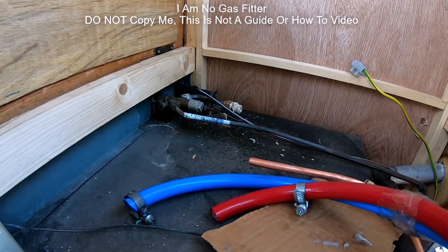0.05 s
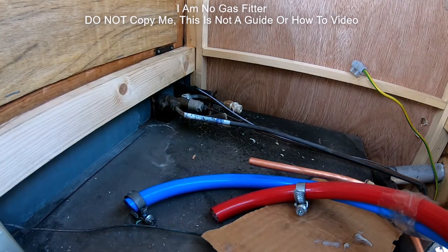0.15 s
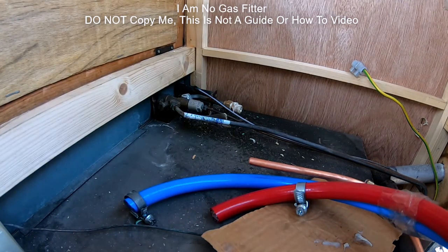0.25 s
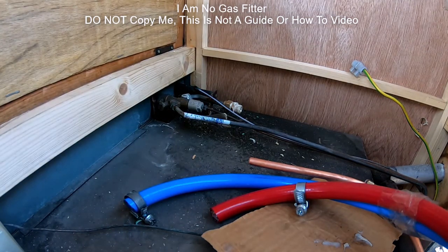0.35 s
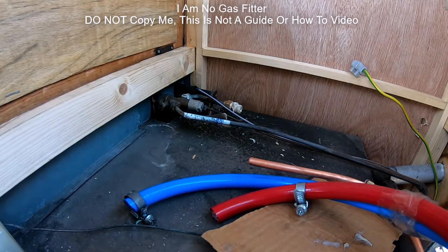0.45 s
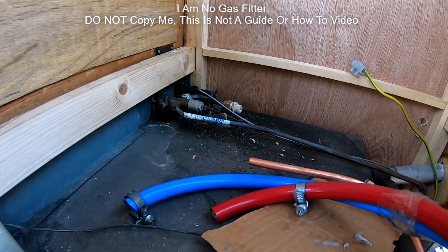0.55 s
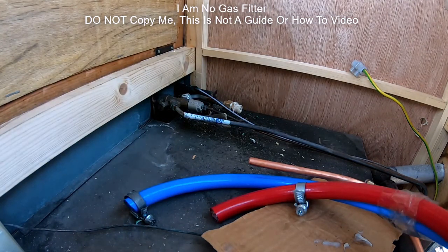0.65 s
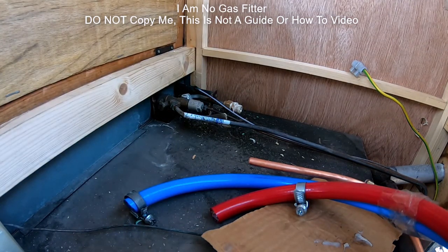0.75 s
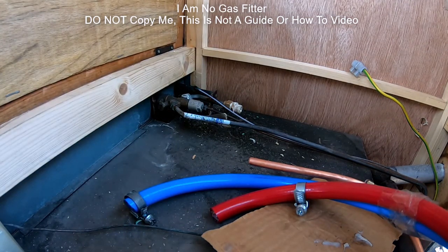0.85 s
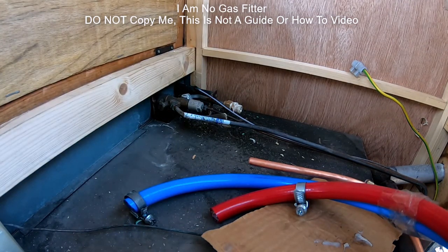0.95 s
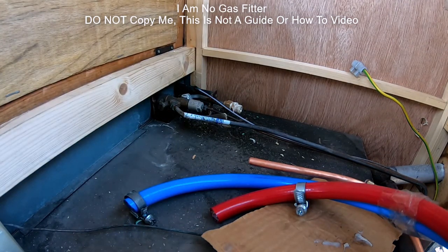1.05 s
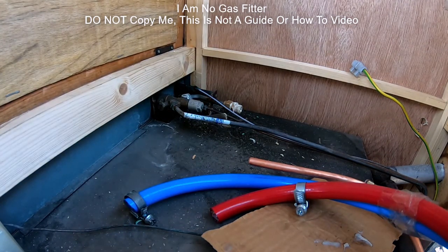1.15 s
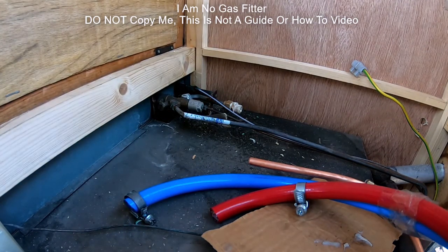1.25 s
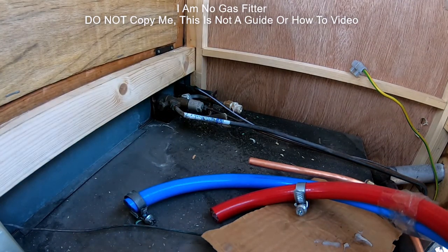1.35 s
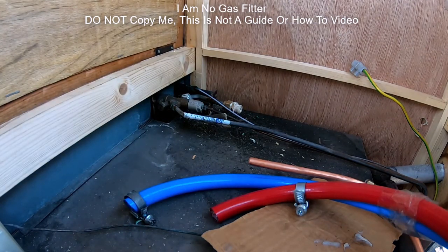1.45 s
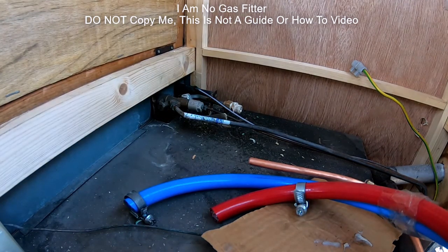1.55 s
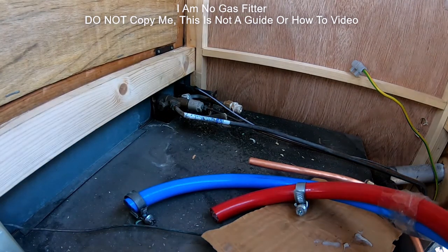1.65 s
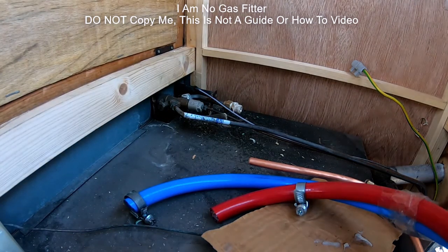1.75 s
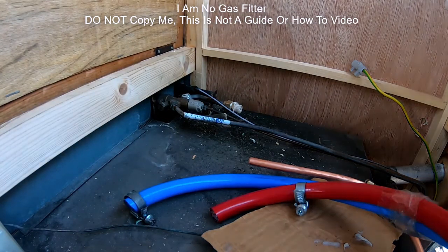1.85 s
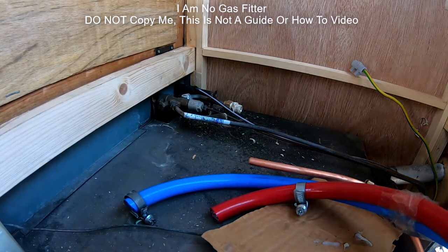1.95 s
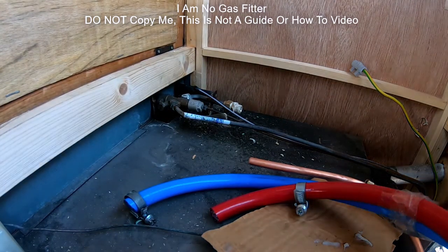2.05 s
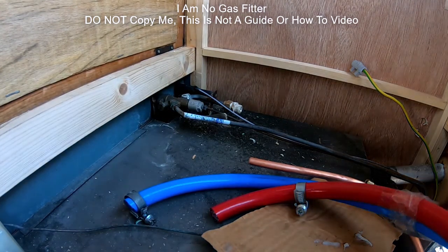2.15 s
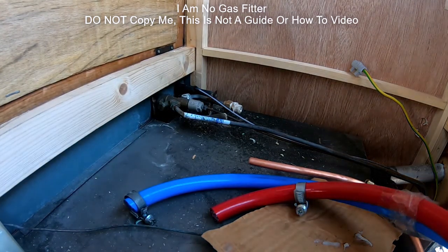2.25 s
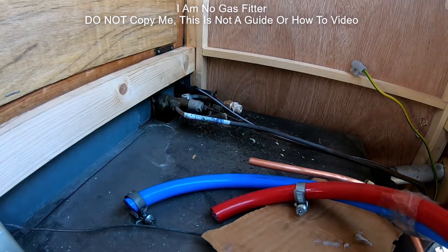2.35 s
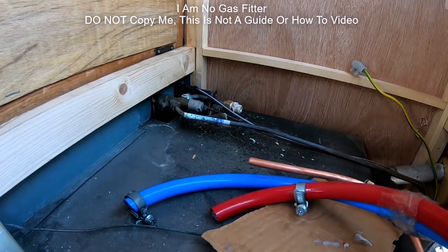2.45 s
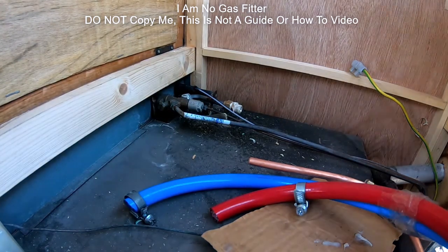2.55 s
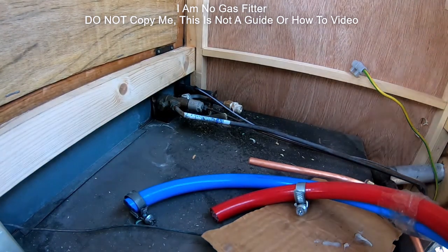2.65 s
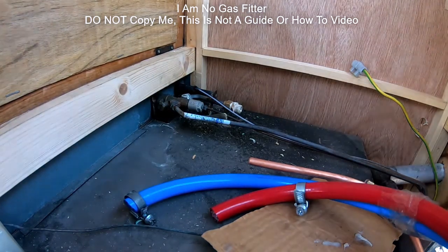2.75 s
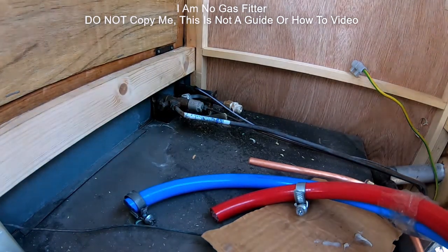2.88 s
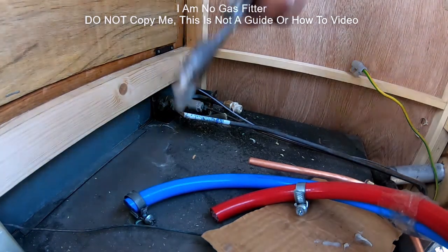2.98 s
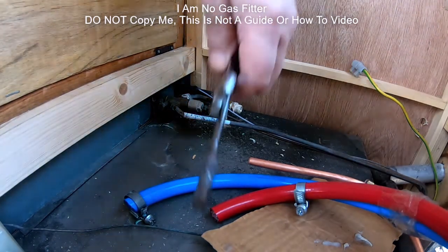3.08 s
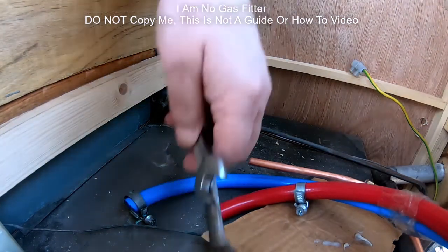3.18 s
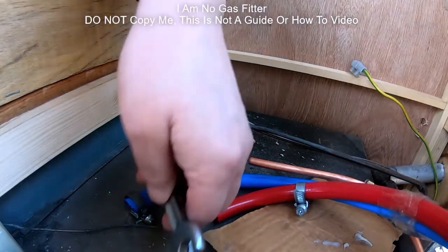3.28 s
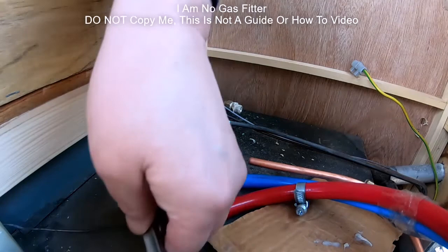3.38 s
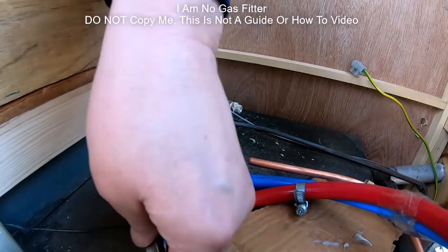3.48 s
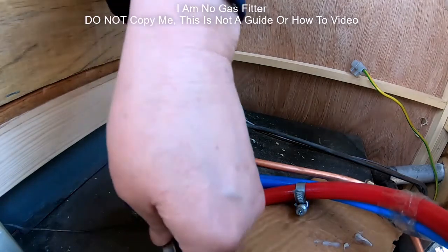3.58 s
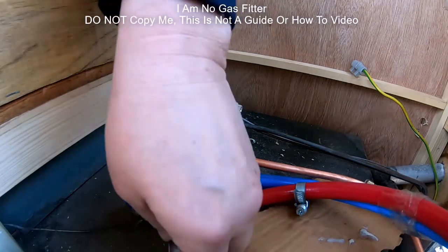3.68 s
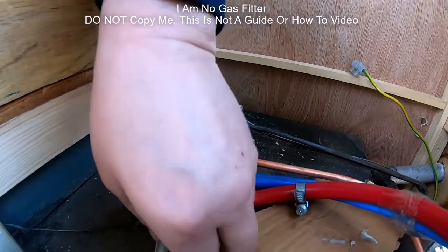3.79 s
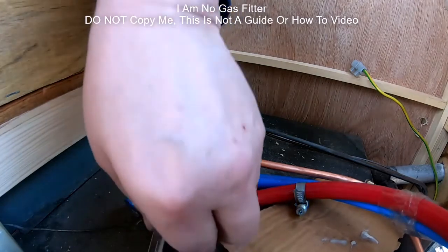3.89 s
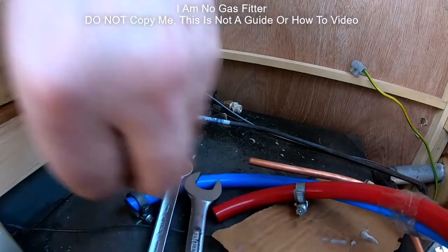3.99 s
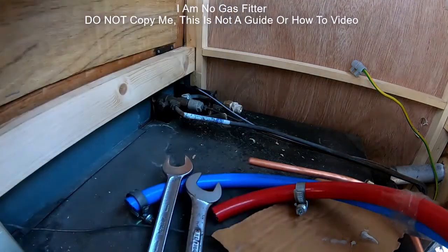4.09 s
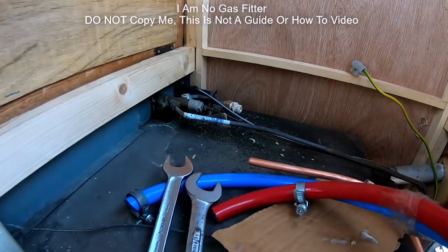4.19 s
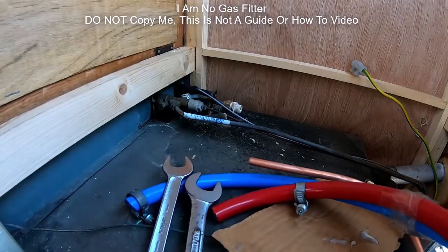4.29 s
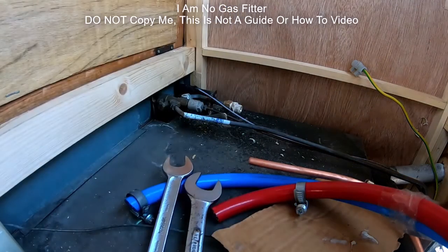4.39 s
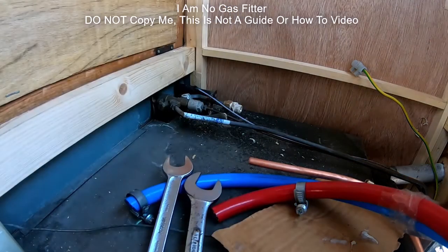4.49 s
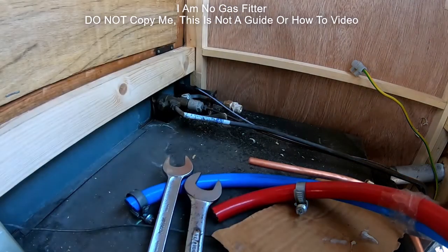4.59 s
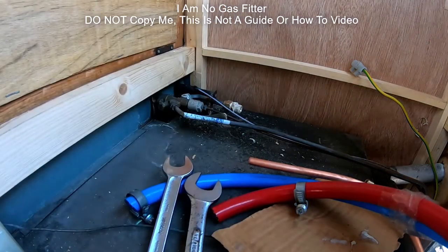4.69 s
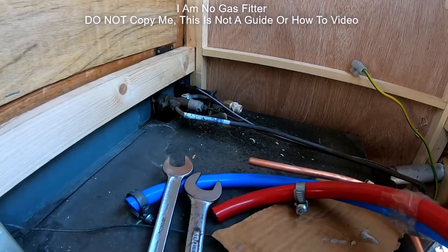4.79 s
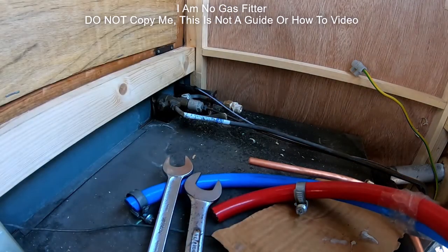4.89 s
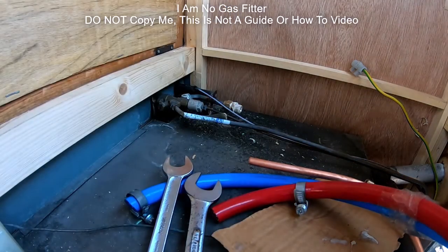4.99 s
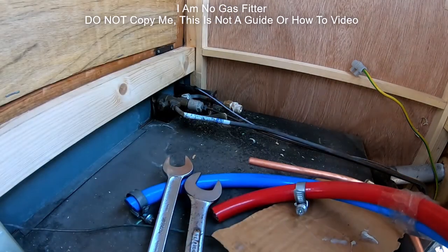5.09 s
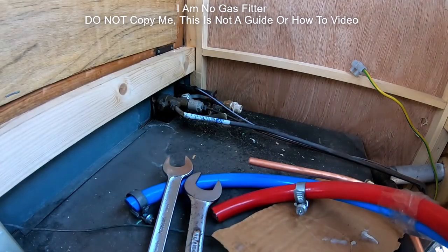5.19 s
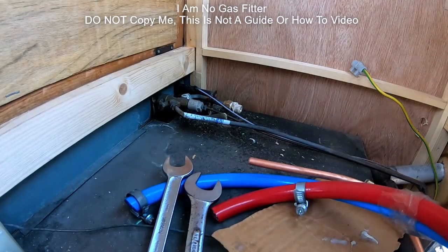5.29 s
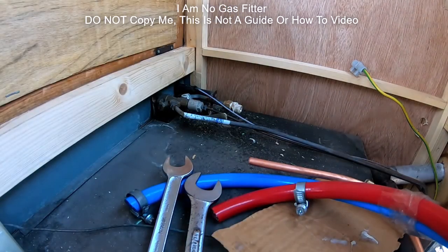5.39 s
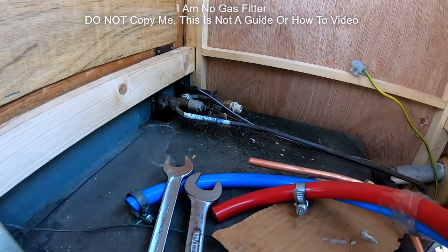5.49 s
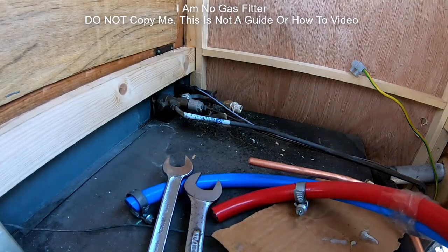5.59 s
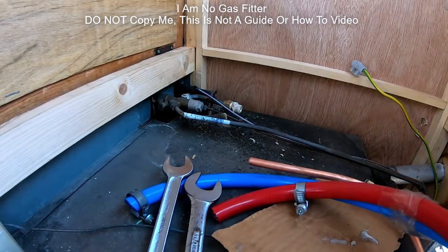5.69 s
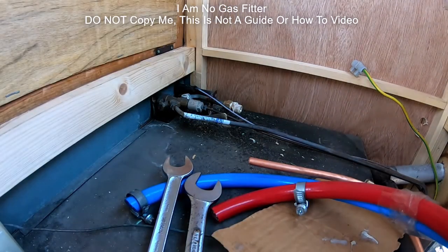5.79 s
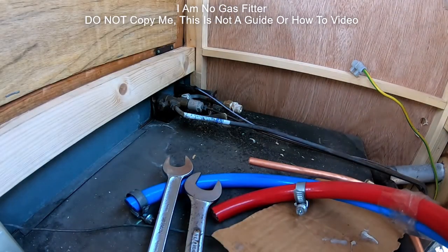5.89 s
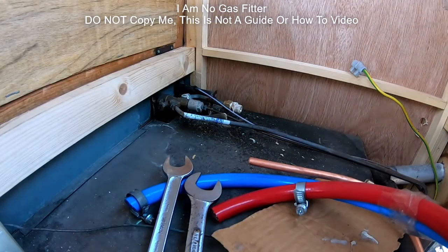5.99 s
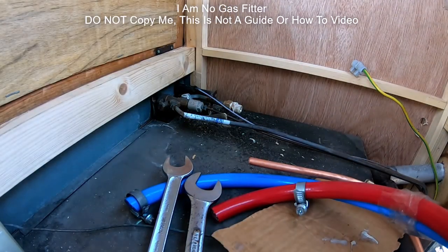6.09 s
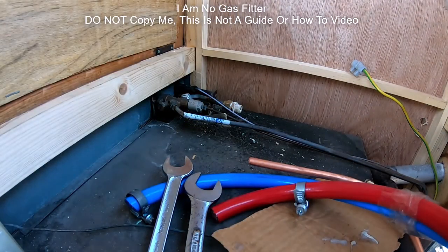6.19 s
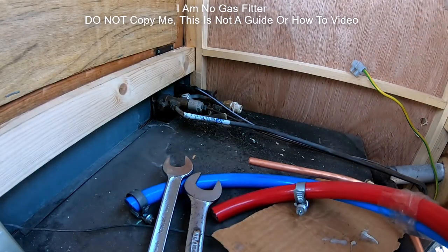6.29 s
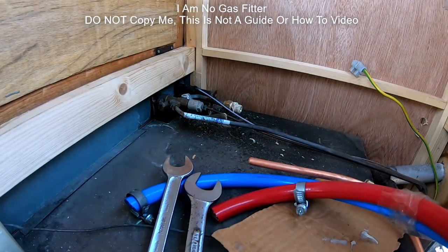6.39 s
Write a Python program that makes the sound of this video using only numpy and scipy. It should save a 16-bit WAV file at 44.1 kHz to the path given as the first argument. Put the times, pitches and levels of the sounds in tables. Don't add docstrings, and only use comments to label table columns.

```python
import sys
import numpy as np
from scipy import signal
from scipy.fft import rfft, irfft, next_fast_len
from scipy.io import wavfile
from scipy.ndimage import uniform_filter1d, map_coordinates

SR = 44100
rng = np.random.default_rng(int(sys.argv[2]) if len(sys.argv) > 2 else 0)


def master(y):
    cut = np.clip(np.atleast_2d(y).T, -1, 1)
    pcm = np.round(cut * 32767)
    wavfile.write(sys.argv[1], SR, pcm.astype(np.int16))


def invert_db(x):
    u = np.asarray(x, float) / 20
    return 10 ** u


N = 283987

# f/Hz, width/Hz, level/dB
BOARDS = [(67, 6.2, -6.5), (176.6, 36, 0.5), (242.2, 30, -9.5), (292, 30, -3), (399.7, 35, -5),
          (458.4, 33, 4.5), (576, 29, -12), (701, 30, -7), (915, 51, -14), (1425, 51, -18),
          (1910, 700, -23.5)]
# f/Hz, level/dB
CRACK = [(900, -19), (2000, -2), (5000, 0), (8500, 1), (10000, -15.5), (13500, -21), (16000, -30.5)]
# f/Hz, level/dB
THUMP = [(30, -19.5), (100, 0.5), (300, -3.5), (700, 1.5), (1500, -17), (4000, -37)]
DULL_DB, DULL_SLIDE_DB = -19, -22
EARS_APART = .75
SMOOTH_DB = 1


def unit(x):
    return x / np.sqrt(np.mean(x ** 2) + 1e-20)


def along(points, hz):
    f, v = np.transpose(points)
    return np.interp(np.log(hz + 1), np.log(f + 1), v)


def curves(rows, t):
    s, *cols = np.transpose(rows)
    return [np.interp(t, s, c) for c in cols]


def wobble(n, rate):
    return map_coordinates(rng.standard_normal(int(n * rate / SR) + 4), [np.arange(n) * rate / SR])


def swell(t, s, rise, fall, db):
    return invert_db(db - 20 * ((t - s) / np.where(t < s, rise, fall)) ** 2)


def pair(n, apart):
    mid, side = rng.standard_normal((2, n))
    return np.array([mid + apart * side, mid - apart * side])


def filtered(x, response):
    n = x.shape[-1]
    m = next_fast_len(n + min(n // 4, 8192))
    return irfft(rfft(x, m) * response(np.fft.rfftfreq(m, 1 / SR)), m)[..., :n]


def causal(gain):
    cepstrum = irfft(np.log(gain + 1e-6))
    half = len(cepstrum) // 2
    cepstrum[1:half] *= 2
    cepstrum[half + 1:] = 0
    return np.exp(rfft(cepstrum))


def body(modes, smooth, smooth_db, colour, scatter_db, apart, held=0):
    detune, hand_damps = .02, 1.6
    common = rng.standard_normal((len(modes), 1, 1))
    per_ear = rng.standard_normal((len(modes), 2, 1))
    luck = invert_db(scatter_db * (common + apart * per_ear))
    gripped = [(c * (1 + held * detune * rng.standard_normal()), w * hand_damps ** held, db)
               for c, w, db in modes]

    def response(f):
        rings = 0
        for k, (c, w, db) in enumerate(gripped):
            resonance = 1j * f * w / (c * c - f * f + 1j * f * w)
            rings = rings + (-1) ** k * luck[k] * invert_db(db) * resonance
        broadband = causal(invert_db(smooth_db + along(smooth, f)))
        return (rings + broadband) * causal(invert_db(along(colour, f)))
    return response


def strikes(events, modes, smooth, smooth_db, shade_hz, damping, rise, t60, push, apart, scatter_db, lift_db,
            held=0):
    grain_db = 3
    out = np.zeros((2, N + SR))
    t = np.arange(SR // 5) / SR
    usual = np.mean(events, 0)[2:]
    for s, db, *shade in events:
        envelope = invert_db(grain_db * wobble(len(t), 600) - 60 * t / t60) * (1 - np.exp(-t / rise)) ** 2
        chatter = pair(len(t), apart) * envelope
        force = chatter + push * 2 * t / rise * np.exp(-2 * t / rise)
        colour = sorted(list(zip(shade_hz, shade - usual)) + damping)
        fade = np.cos(np.pi / 2 * t / t[-1])
        ring = filtered(force, body(modes, smooth, smooth_db, colour, scatter_db, apart, held)) * fade
        peak = np.sqrt(uniform_filter1d(np.mean(ring ** 2, 0), size=200).max())
        out[:, round(s * SR):][:, :len(t)] += invert_db(db + lift_db) * ring / peak
    return out[:, :N]


def slides(strokes, modes, smooth_db, grit_db, colour):
    out = np.zeros((2, N))
    for s, rise, fall, db in strokes:
        a, b = round((s - 2 * rise) * SR), round((s + 2 * fall) * SR)
        grains = invert_db(grit_db * wobble(N // 20, 290))[:b - a]
        force = pair(N // 20, EARS_APART)[:, :b - a] * grains
        ring = unit(filtered(force, body(modes, CRACK, smooth_db, colour, 0.5, 0.34)))
        out[:, a:b] += swell(np.arange(a, b) / SR, s, rise, fall, db) * ring
    return out


def rush(spectrum, patchy_db):
    # f/Hz, correlation
    alike = [(60, .9), (130, .95), (200, .9), (400, .75), (1200, .3), (2400, .5), (8000, .05)]
    z = signal.stft(rng.standard_normal((2, N)), nperseg=512)[2]
    field = uniform_filter1d(rng.standard_normal(z.shape[1:]), size=6, axis=0)
    field = uniform_filter1d(field, size=8, axis=1)
    noise = signal.istft(z * invert_db(patchy_db * unit(field)), nperseg=512)[1][:, :N]

    def mid_and_side(hz):
        turn = np.arccos(np.clip(along(alike, hz), -1, 1)) / 2
        return invert_db(along(spectrum, hz)) * [np.cos(turn), np.sin(turn)]
    mid, side = filtered(noise, mid_and_side)
    return unit(np.array([mid + side, mid - side]))


def gripped_steel():
    # t/s, peak level/dB, low, middle and high modes/dB
    clinks = [(2.173, -27.5, 11.5, 5, -8.5), (2.179, -30, 12, 2.5, -5), (2.192, -38.5, 8.5, 1.5, -9),
              (2.2252, -23.5, -0.5, -3.5, -2), (2.233, -31.5, -7, -5, -4.5), (2.309, -33.5, -9, -4, -2.5),
              (2.325, -20, -7, -8, 4), (2.3341, -15, -10, -12.5, 1), (2.343, -25.5, -8, -7.5, 12),
              (2.3552, -31.5, -1, -7, 11.5), (2.387, -26, 5.5, 0.5, 1.5), (2.396, -30, 4.5, 0, -0.5),
              (2.422, -27, 8, 4.5, -9), (2.4319, -15, -9.5, 2, -3), (2.576, -43, 3.5, -1, -11)]
    # f/Hz, width/Hz, level/dB
    modes = [(1860, 19, -23), (3312, 50, -7), (4340, 50, -9), (4700, 80, -12.5), (5445, 63, -4),
             (6420, 41, -15), (7400, 43, -15.5), (7500, 56, 4), (7900, 60, 0.5), (8090, 87, 1),
             (8390, 310, -9.5), (10520, 24, -15), (11550, 44, -15.5), (12600, 35, -15), (13400, 50, -24),
             (14600, 60, -29.5)]
    # top t/s, rise/s, fall/s, level/dB
    strokes = [
        (2.185, 0.013, 0.068, -32.5),
        (2.235, 0.05, 0.11, -36),
        (2.345, 0.017, 0.034, -30.5),
    ]
    steel = strikes(clinks, modes, CRACK, DULL_DB, (3500, 5500, 11500),
                    [(7800, 0.0), (13800, -4.5), (16000, -14.5)], rise=0.0011, t60=0.068, push=0,
                    apart=EARS_APART, scatter_db=5.6, lift_db=-3.5, held=0.3)
    return steel + slides(strokes, modes, DULL_SLIDE_DB, 1.4,
                          [(3000, -1.0), (9000, -9.0), (14000, -6.5), (16000, -32.0)])


def turned_steel():
    # t/s, peak level/dB, low, middle and high modes/dB
    clinks = [
        (2.7007, -34.5, 3.5, -1.5, -2.5),
        (2.757, -26.5, 2.5, 12.5, -8),
        (2.78, -28.5, -6, 3, -13),
        (2.827, -20, -4.5, 1, 4),
        (2.9602, -57, -22, 2.5, 3.5),
        (3.1404, -52.5, -1, -7, -6),
        (3.1757, -46.5, -1.5, -17, 0),
    ]
    # f/Hz, width/Hz, level/dB
    modes = [(2054, 32, -12), (2494, 69, -11.5), (3300, 76, -17), (3800, 180, 1.5), (3820, 160, -7.5),
             (4150, 93, -10.5), (4400, 69, -4), (4630, 83, -4.5), (5830, 64, -4.5), (7220, 30, -10),
             (7630, 100, -3.5), (8480, 104, -14), (11530, 120, -19.5), (13040, 200, -29)]
    # top t/s, rise/s, fall/s, level/dB
    strokes = [
        (2.77, 0.042, 0.035, -36),
        (3.048, .03, 0.029, -46),
    ]
    steel = strikes(clinks, modes, CRACK, DULL_DB, (2200, 3800, 8000),
                    [(5500, -1.0), (13800, -6.5), (16000, -13.0)], rise=0.00028, t60=0.049, push=0,
                    apart=EARS_APART, scatter_db=2.36, lift_db=-2.2, held=0.46)
    steel += slides(strokes, modes, DULL_SLIDE_DB, 2.0,
                    [(2000, -3.5), (4000, -10.0), (9000, -5.5), (16000, -11.0)])
    pan_db = -3
    return steel * invert_db(pan_db * np.array([[.5], [-.5]]))


def slid_steel():
    # top t/s, rise/s, fall/s, level/dB
    strokes = [
        (3.21, .012, 0.061, -39.5),
        (3.25, 0.034, 0.048, -40),
    ]
    # f/Hz, width/Hz, level/dB
    modes = [(2297, 38.8, -10.5), (2744, 50, -9), (3730, 48, -16), (4540, 126, -6), (5880, 64, -6),
             (7920, 49, 5.5), (7890, 34, -12.5), (8390, 68, -4.5), (10350, 31, -28.5), (10890, 40, -15),
             (11750, 36, -25)]
    return slides(strokes, modes, DULL_SLIDE_DB, 1.485, [(2000, -1.5), (9000, -7), (16000, -19.0)])


def lowered_steel():
    # t/s, peak level/dB, low, middle and high modes/dB
    lowered = [
        (3.3463, -14.5, 1, 1.5, 7),
        (3.359, -22, 2, 2, 6.5),
        (3.372, -27, 4.5, -1.5, -1),
        (3.417, -47, -2, 4, -7.5),
        (3.423, -28.5, 5.5, 10.5, -10.5),
    ]
    set_down = [
        (3.4811, -22, 1.5, 8, 0),
        (3.495, -22.5, 4, 0, 0),
        (3.5149, -20, 3.5, 5, 0),
        (3.568, -22, -0.5, 7.5, 0),
        (3.575, -26, -4.5, 1.5, 0),
    ]
    # f/Hz, width/Hz, level/dB
    lowered_modes = [(1980, 48, -20.5), (4473, 43, -0.5), (5430, 83, -3), (7030, 45, -9.5), (7300, 43, -1),
                     (7930, 49, 4), (8050, 21, -1), (8250, 68, 1), (9355, 84, -8.5), (10960, 23, -22),
                     (11100, 26, -17), (11560, 49, -14), (13260, 40, -20)]
    set_down_modes = [(2300, 33, -8), (4580, 37, -2), (5660, 22, -4.5), (6480, 32, -5.5), (7150, 40, -15.5),
                      (7470, 37, -5.5), (7850, 32, -0.5), (8130, 41, -3.5), (8280, 80, 1), (8630, 25, -11),
                      (8790, 41, -3.5), (10800, 34, -15), (11430, 280, -25)]
    # top t/s, rise/s, fall/s, level/dB
    strokes = [
        (3.337, 0.021, .015, -38),
        (3.375, .03, 0.085, -33),
        (3.714, 0.024, .01, -45),
    ]
    steel = np.zeros((2, N))
    for taps, modes in (lowered, lowered_modes), (set_down, set_down_modes):
        steel += strikes(taps, modes, CRACK, -16.0, (4400, 5700, 11500),
                         [(2000, -4), (7800, 0), (16000, -14)], rise=0.0004, t60=0.046, push=0,
                         apart=EARS_APART, scatter_db=3, lift_db=-2.5, held=0.99)
    return steel + slides(strokes, lowered_modes, DULL_SLIDE_DB, 1.6,
                          [(3000, 1.5), (9000, -7.5), (14000, -4.5), (16000, -29.5)])


def peals():
    # t/s, level/dB
    blows = [
        (3.757, -12.5),
        (3.8013, -0.5),
        (3.8584, -5),
    ]
    # f/Hz, level/dB, t60/s
    partials = [(3325, -26.5, .23), (4365, -14, .14), (7542, -23, .2), (11480, -40, .4), (7009, -41, .4),
                (8123, -26, .07), (11890, -42, .16), (15000, -54, .13)]
    rise = .002
    t = np.arange(N) / SR
    out = np.zeros(N)
    for s, db in blows:
        age = np.clip(t - s, 0, None)
        onset = 1 - np.exp(-age / rise)
        for hz, level, t60 in partials:
            out += invert_db(db + level - 60 * age / t60) * onset * np.sin(2 * np.pi * hz * age)
    return out


def dropped_steel():
    # t/s, peak level/dB, low, middle and high modes/dB
    dropped = [
        (3.7195, -18, -16, -6.5, 0.0054),
        (3.728, -25.5, -4, -8, 0.012),
        (3.8018, -17.5, -3.5, -3.5, 0.00082),
        (3.8586, -23, 4.5, 3.5, 0),
    ]
    settling = [
        (3.902, -30.5, -10.5, 10, -7.5),
        (3.915, -32, -21, -3, -9),
        (4.074, -44.5, 7, 5, -7),
    ]
    # f/Hz, width/Hz, level/dB
    modes = [(2240, 53, -19.5), (3362, 84, -9), (4440, 27, -6), (5400, 32, -6), (6360, 12, -18),
             (7040, 15, -12), (7590, 34, -5.5), (7800, 20, -8.5), (8240, 44, -8.5), (8500, 26, -22),
             (9990, 8, -20), (10570, 20, -17.5), (11700, 17, -13.5), (11940, 12, -14.5), (12500, 27, -31),
             (13550, 40, -26.5), (15000, 20, -28.5)]

    def free(taps):
        return strikes(taps, modes, CRACK, -28.0, (4370, 5440, 11500),
                       [(2300, -2.5), (3330, -2.0), (7500, 4.5), (16000, -2.5)], rise=0.00094, t60=0.13,
                       push=0, apart=0.13, scatter_db=1.4, lift_db=-2.2)
    pinned_s, pinned_t60, pinned_left_db = 3.888, 0.044, -19
    t = np.arange(N) / SR
    pinned = invert_db(np.clip(-60 * (t - pinned_s) / pinned_t60, pinned_left_db, 0))
    return (free(dropped) + peals()) * pinned + free(settling)


def glancing_steel():
    # t/s, peak level/dB
    blows = [
        (3.7565, -22),
        (3.766, -31.5),
    ]
    # f/Hz, width/Hz, level/dB
    modes = [(2134, 44, -5.5), (3265, 61, -4.5), (4230, 25, -13.5), (5400, 33, 0.5), (7000, 27, -16),
             (7370, 38, -10.5), (8000, 38, -8), (10200, 21, -30.5), (10830, 81, -26), (11560, 24, -14.5),
             (12500, 31, -20), (13900, 35, -42)]
    return strikes(blows, modes, CRACK, -18.5, (), [(3000, -2.0), (16000, -2)], rise=0.00116, t60=0.11,
                   push=0, apart=0.18, scatter_db=1.1, lift_db=-0.98)


def lingering_tones():
    # f/Hz, level/dB, start t/s, t60/s
    tones = [(4420, -57, 2.577, .2), (7752, -86, 4.1, 6), (7750, -44, 3.905, .33), (7542, -46, 3.895, .25),
             (7006, -54, 3.9, .4), (11890, -63, 3.9, .5), (5426, -38, 3.903, .26), (4330, -48, 4.09, .19),
             (9706, -57, 3.88, .6)]
    t = np.arange(N) / SR
    out = np.zeros(N)
    for hz, db, s, t60 in tones:
        level_db = db - 60 * (t - s) / t60 + 1.6 * wobble(N, 7.9)
        out += (t > s) * invert_db(level_db) * np.sin(2 * np.pi * hz * t)
    return out


def rocking():
    first_s, swing_s, shrink = 4.189, .0543, .9425
    k = np.arange(17)
    return k, first_s + swing_s * (1 - shrink ** k) / (1 - shrink), k % 2 == 0


def rocking_ticks():
    # f/Hz, width/Hz, level/dB
    modes = [(3310, 61, 8.5), (5470, 120, -5), (7750, 40, -1), (8020, 80, 3.5), (10600, 34, -2)]
    k, s, jaw = rocking()
    tick_db, loss_db = -71.5, 0.1
    ticks = np.transpose([s, tick_db - loss_db * k])[jaw]
    return strikes(ticks, modes, CRACK, -48.0, (), [(4500, 0)], rise=0.00082, t60=0.026, push=0,
                   apart=0.26, scatter_db=1.5, lift_db=5.8)


def landings():
    # t/s, peak level/dB, knock/dB, rap/dB
    blows = [(3.481, -24.5, -5.5, -5.5), (3.505, -16, -11, -16), (3.572, -26.5, -5.5, -15.5),
             (3.7055, -11.5, -15, -30.5), (3.758, -21, 3.5, -22), (3.72, -21.5, 11.5, -6.5),
             (3.739, -22, -17.5, -23.5), (3.788, -16, -17.5, -22), (3.861, -21.5, -7, -39.5),
             (3.902, -14, 1, -23.5), (3.894, -17.5, -1, -26), (3.96, -18, -12, -31),
             (3.978, -21.5, -7, -19.5), (4.0675, -19, -16, -28.5), (4.079, -16, -8.5, -19.5),
             (4.101, -18.5, -4.5, -16.5)]
    leaning = [
        (5.448, -34, -4, -23),
    ]
    # t/s, peak level/dB
    slams = [
        (3.8885, -6.5),
        (3.917, -10),
    ]
    wood = strikes(blows + leaning, BOARDS, THUMP, -7.5, (460, 1600),
                   [(70, -10.0), (240, -1.5), (5000, 1.5), (9000, -25.5), (16000, -61.5)], rise=0.00088,
                   t60=0.058, push=2.25, apart=0.052, scatter_db=2.5, lift_db=0.86, held=0.33)
    return wood + strikes(slams, BOARDS, THUMP, 4.7, (),
                          [(70, -9), (300, 1.5), (1600, -10.0), (5000, -12.5), (16000, -59.5)], rise=0.00075,
                          t60=0.017, push=6.2, apart=.12, scatter_db=1.5, lift_db=.1)


def hose_tap():
    # t/s, peak level/dB
    tip_down = [
        (3.479, -23.5),
    ]
    # f/Hz, width/Hz, level/dB
    hose = [(522, 73, -6), (770, 140, 5.5)]
    return strikes(tip_down, hose, THUMP, -15.5, (), [(300, -6), (760, 0.8), (5000, -8.0)], rise=0.0015,
                   t60=0.035, push=1.4, apart=0.19, scatter_db=1.5, lift_db=0.11)


def rocking_thuds():
    # f/Hz, width/Hz, level/dB
    modes = [(177, 42, 3.5), (280, 60, -0.5), (340, 77, -6.5), (479, 36, 5), (585, 117, -10),
             (705, 54, -6.5), (1575, 113, -11)]
    k, s, jaw = rocking()
    thud_db, loss_db, loss_grows_db, jaw_weaker_db, jaw_rap_db = -28.5, .7, .055, 1, .8
    level_db = thud_db - k * (loss_db + loss_grows_db * k) - jaw_weaker_db * jaw
    rap_db = jaw_rap_db * k * (1 + jaw / 2)
    return strikes(np.transpose([s, level_db, rap_db]), modes, THUMP, -30.5, (1600,),
                   [(200, -2.0), (700, 0.5), (3000, 3.0), (16000, -64)], rise=0.001, t60=0.039, push=2.3,
                   apart=.04, scatter_db=1, lift_db=3.33)


def dragging():
    # t/s, pressure level/dB
    drag = [
        (3.52, -29.5),
        (3.61, -34.5),
        (3.67, -34),
        (3.75, -25),
        (3.84, -28),
        (3.93, -24),
        (4.0, -47),
        (4.05, -41.5),
        (4.1, -25.5),
        (4.17, -74),
    ]
    t = np.arange(N) / SR
    boards_db, = curves(drag, t)
    grit_db = -51 + 1.42 * (boards_db - np.mean(drag, 0)[1])
    on = uniform_filter1d(1. * (t > drag[0][0]) * (t < drag[-1][0]), size=900)
    colour = [(180, 1.5), (270, -3.5), (460, -2), (1500, -30.0)]
    low = unit(filtered(pair(N, .04), body(BOARDS, THUMP, -20.5, colour, 1.3, .04)))
    grit = rush([(500, -28.5), (1100, -5.5), (1500, -3.5), (2200, -8.0), (4000, -19), (9000, -34.5),
                 (15000, -69.5)], patchy_db=2)
    return on * (invert_db(boards_db + 3 * wobble(N, 40)) * low + invert_db(grit_db + 3.1 * wobble(N, 90)) * grit)


def floor_boom():
    # f/Hz, level/dB, start t/s, t60/s
    tones = [
        (71.6, -29, 3.9, 1),
        (70.3, -38.5, 3.7, 0.89),
    ]
    t = np.arange(N) / SR
    out = np.zeros((2, N))
    for hz, db, s, t60 in tones:
        age = np.clip(t - s, 0, None)
        level = invert_db(db - 60 * age / t60 + 2 * wobble(N, 12))
        out += level * np.sin(2 * np.pi * hz * age) * [[1.1], [.9]]
    return out


def knees():
    # t/s, peak level/dB, boom/dB, knock/dB
    knocks = [(0.523, -38.5, -10, -8.5), (0.53, -32, -23.5, -18), (0.545, -33, -24, -35),
              (0.577, -44.5, -15.5, -12), (0.629, -39, -28.5, -12.5), (0.636, -33, -30, -16.5),
              (0.653, -39, -17, -34), (1.169, -42.5, 5.5, -13), (1.621, -43, 6, -14.5),
              (1.669, -40.5, -6, -11), (1.82, -44, -22.5, -9.5), (2.099, -37, -10.5, -22.5),
              (2.238, -23.5, -16, -30.5), (4.868, -44, -19.5, -28.5), (5.303, -38, -21, -39.5),
              (5.448, -29.5, -18, -32.5), (6.343, -37, 13.5, -16)]
    # f/Hz, width/Hz, level/dB
    panel = [(71.6, 21, 5), (172, 45, 8), (270.4, 71, 2), (350, 120, -0.5), (493, 32, -13.5),
             (831, 190, -6), (1050, 240, -1.5), (1829, 370, -14), (2870, 390, -23)]
    shaded = [(*row, row[-1]) for row in knocks]
    return strikes(shaded, panel, THUMP, -6.0, (80, 1000, 4000), [(240, 1.0), (8000, -36.0), (16000, -67)],
                   rise=0.00065, t60=0.076, push=1.75, apart=0.15, scatter_db=1.2, lift_db=1.8)


def seat_ticks():
    # t/s, peak level/dB, bright/dB
    creaks = [
        (1.669, -52, -1),
        (1.821, -67, -6),
        (2.1, -66, -2),
        (5.452, -40.5, -7),
        (5.6964, -53.5, 13),
        (5.845, -50.5, 1),
        (5.856, -64, -4.5),
    ]
    # f/Hz, width/Hz, level/dB
    seat = [(2830, 730, -16), (3760, 220, 9), (4660, 660, -10.5), (7700, 1300, -16.5)]
    return strikes(creaks, seat, CRACK, -11.5, (7800,), [(4000, 2.5), (16000, -16)], rise=.0025, t60=0.062,
                   push=0, apart=EARS_APART, scatter_db=3.5, lift_db=-2.3)


def clothes():
    # top t/s, half length/s, level/dB
    rubs = [(0.763, 0.045, -70.5), (1.383, 0.12, -64.5), (1.641, 0.052, -57), (1.933, 0.79, -67),
            (2.597, 0.52, -66.5), (4.04, 0.26, -60.5), (4.881, 0.12, -59), (5.127, 0.26, -58.5),
            (5.143, 0.03, -54), (5.198, .02, -60), (6.43, 0.049, -63), (5.474, 0.18, -60),
            (5.727, 0.12, -65), (6.003, 0.31, -64.5), (6.308, 0.048, -59)]
    # f/Hz, level/dB
    early = [(880, -23), (1500, 1.5), (1880, -16.5), (2010, -6), (2220, -9.5), (3690, -12), (8050, -10),
             (12900, -31.5), (15500, -46)]
    dull = [(880, -26), (1500, -2), (2170, -8.5), (4350, -8), (6560, -20.5), (7980, -15), (9790, -30),
            (14600, -38.5), (15500, -42)]
    t = np.arange(N) / SR
    late = np.clip((t - 3.3) / 1.3, 0, 1)
    hiss = (1 - late) * rush(early, SMOOTH_DB) + late * rush(dull, SMOOTH_DB)
    constant_db = -74
    power = invert_db(constant_db) ** 2 + sum(swell(t, s, half, half, db) ** 2 for s, half, db in rubs)
    return np.sqrt(power) * invert_db(1.1 * wobble(N, 40)) * hiss


def outside():
    # t/s, level/dB
    shaking = [
        (0.0, -58.5),
        (1.55, -56.5),
        (2.6, -58.5),
        (3.45, -57),
        (4.0, -66.5),
        (4.64, -51),
        (6.44, -54.5),
    ]
    # t/s, hum level/dB, traffic level/dB
    far = [
        (0.0, -55, -60),
        (3.12, -57.5, -66),
        (4.6, -52, -67.5),
        (5.08, -48, -61),
        (6.44, -56.5, -65.5),
    ]
    # f/Hz, level/dB
    rumble = [(12, -48), (20, -18), (35, -10), (55, 1), (86, -1.5), (105, -9), (140, -28.5), (230, -120)]
    panel_noise = [(76, -38.5), (130, -6.5), (140, -10.5), (184, -2), (225, -9), (264, -8), (433, -29),
                   (600, -31), (780, -52.5), (1320, -120)]
    traffic = [(260, -46), (450, -32), (580, -24), (736, -5), (949, -7), (1190, -6), (1310, -12.5),
               (1560, -13.5), (1750, -21.5), (3000, -42), (3900, -64), (6600, -120)]
    hum = [(95, -67.0), (104, -12), (114, 7.5), (125, -14.0), (135, -69.0)]
    t = np.arange(N) / SR
    body_db, = curves(shaking, t)
    hum_db, traffic_db = curves(far, t)
    air = invert_db(body_db - 1.5 + 1.5 * wobble(N, 21)) * rush(rumble, patchy_db=-2.5)
    air += invert_db(hum_db) * rush(hum, SMOOTH_DB)
    steady_core = np.sin(2 * np.pi * 115 * t + wobble(N, 3.8))
    air += invert_db(hum_db - 6.0 + 1.1 * wobble(N, 5.7)) * steady_core
    air += invert_db(body_db + 1.8 * wobble(N, 5.7)) * rush(panel_noise, patchy_db=-0.5)
    return air + invert_db(traffic_db) * rush(traffic, patchy_db=0.0)


def cabin(x):
    # f/Hz, t60/s
    decay = [(200, 0.28), (2000, 0.11), (10000, 0.012)]
    hz, t, z = signal.stft(rng.standard_normal((2, SR // 3)), SR, nperseg=256)
    spread = np.clip(hz / 1500, 0, 1)[:, None] ** 2
    z = z[0] + spread * np.array([z[1], -z[1]])
    tail = signal.istft(z * invert_db(-60 * t / along(decay, hz)[:, None]), SR, nperseg=256)[1]
    return signal.fftconvolve(x, tail / np.linalg.norm(tail[0]), axes=1)[:, :N]


def at_the_ports(x):
    # f/Hz, left lead/rad
    lead = [(380, 0), (580, -1.1), (1200, -1.7), (2400, -.3), (4500, -1), (8000, -2)]
    # f/Hz, left-right/dB
    side_on = [(4000, 0), (8000, 1.5), (12000, 4)]
    half = np.array([[.5], [-.5]])
    return filtered(x, lambda hz: invert_db(half * along(side_on, hz)) * np.exp(1j * half * along(lead, hz)))


def scene():
    steel = gripped_steel() + turned_steel() + slid_steel() + lowered_steel() + dropped_steel()
    steel += glancing_steel() + lingering_tones() + rocking_ticks() + seat_ticks()
    wood = landings() + hose_tap() + rocking_thuds() + dragging() + floor_boom() + knees()
    room = cabin(invert_db(-9.0) * steel + invert_db(-14) * wood)
    return at_the_ports(steel + wood) + room + clothes() + outside()


def band_limit(x):
    return signal.sosfilt(signal.butter(12, 16460, fs=SR, output="sos"), x)


def record(dry):
    heard = filtered(dry, lambda hz: 1 / (1 + (hz / 16000) ** 40))
    heard = heard / (1 + np.abs(heard / .9) ** 6) ** (1 / 6)
    return band_limit(heard)


dry = scene()
out = record(dry)
master(out)
```